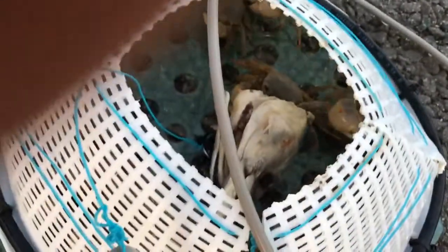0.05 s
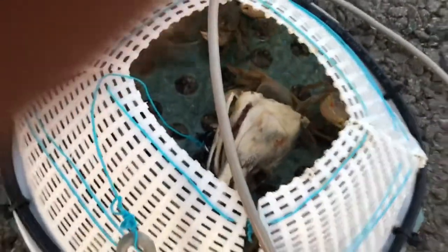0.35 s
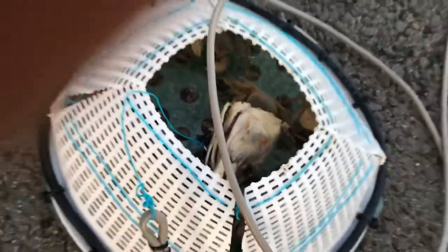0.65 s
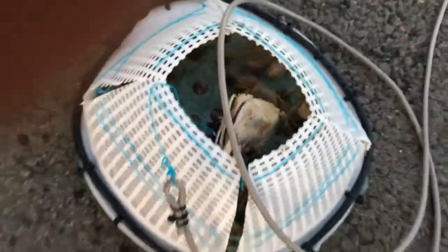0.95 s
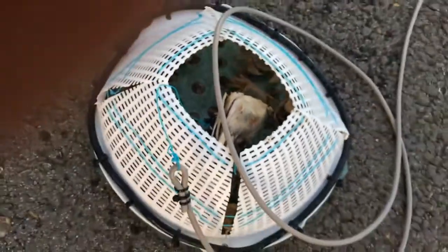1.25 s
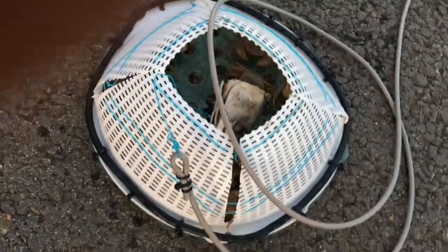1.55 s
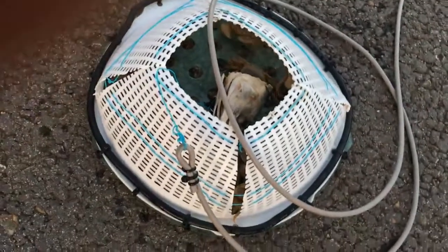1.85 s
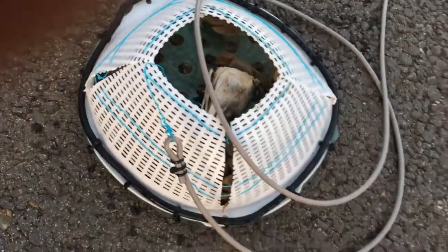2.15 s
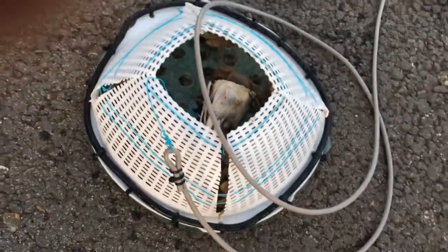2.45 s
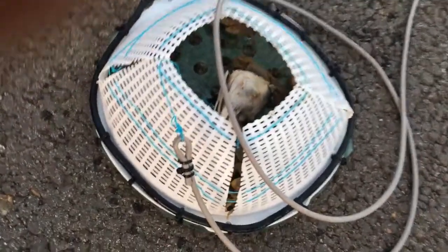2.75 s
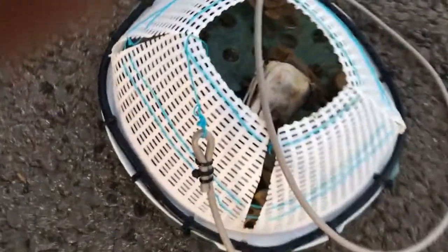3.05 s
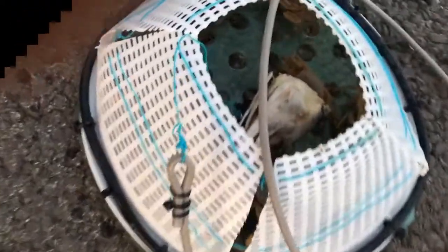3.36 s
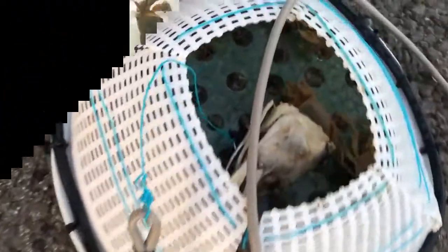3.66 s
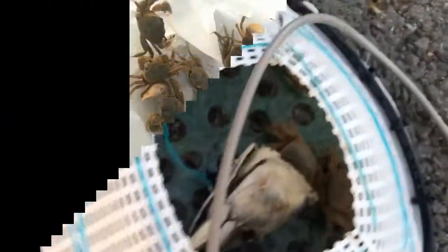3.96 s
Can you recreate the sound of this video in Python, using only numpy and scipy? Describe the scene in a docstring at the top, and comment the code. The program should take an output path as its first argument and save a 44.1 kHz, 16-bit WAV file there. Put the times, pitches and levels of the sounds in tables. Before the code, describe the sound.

Crabs scrabble in a plastic mesh trap, shells crackling and legs snapping and scraping close to the microphone. They settle past halfway, while low outdoor wind rumbles and distant road noise and an engine hum grow.

```python
"""Crabs in a plastic mesh trap standing on asphalt, microphone just above it.
From the start, shells crackle and leg tips snap off the mesh or drag across it in short scrapes,
over a low rumble of wind. The snaps are loudest about a second in. Past halfway the crabs calm down,
while far off a wash of road noise and an engine hum grow, the hum peaking near the end."""
import sys
import numpy as np
from scipy import signal
from scipy.fft import rfft, irfft, next_fast_len
from scipy.io import wavfile

SR = 44100
rng = np.random.default_rng(int(sys.argv[2]) if len(sys.argv) > 2 else 0)


def generate_wav(sig):
    """Save sig (samples, or channels by samples) to the path in sys.argv[1] as 16-bit PCM at SR."""
    pcm = np.round(np.clip(np.atleast_2d(sig).T, -1, 1) * 32767).astype(np.int16)
    wavfile.write(sys.argv[1], SR, pcm)


N = 176400
T = np.arange(N) / SR

# resonances of shell and mesh: frequency_hz, gain_db
TRAP_RESONANCES = [(600,-15),(1300,-11.5),(2050,-3.5),(2550,-6),(3200,0),(4100,0.5),(4900,-4),(5700,3.5),(6400,1.5),(7700,-7.5),(9400,-4.5),(10400,-14),(12000,-10),(15800,-18)]


def leg_snaps():
    """A leg tip or claw snaps off the mesh right under the microphone and rings it briefly."""
    # start_s, level_db, ring_hz, knock_db, click_db, sparkle_db (the last three relative to level_db)
    snaps = [(0.1408, -31.5, 6500, -26, -10, -13), (0.157, -28.5, 5800, -23, -11, -16),
             (0.2066, -30.5, 3970, -24, -13, -11.5), (0.4017, -29, 4850, -15, -10, -15),
             (0.4302, -32.5, 5600, -16, -12, -13), (0.4395, -30.5, 5590, -24, -7.5, -18),
             (0.4616, -34, 3330, -7, -12, -25), (0.5028, -33, 6030, -11, -10, -18),
             (0.5182, -19, 7050, -27, -14.5, -18), (0.5275, -26, 4700, -25, -9, -13),
             (0.5737, -18, 4330, -10, -13, -22), (0.597, -27, 6260, -27, -12, -16),
             (0.6085, -24, 6800, -14, -9.5, -14), (0.6303, -25, 5770, -12, -12, -20),
             (0.6679, -30, 2100, -3, -7.5, -30), (0.6994, -18.5, 3300, -9.5, -14.5, -16.5),
             (0.7092, -27, 3100, -12, -11, -20), (0.7482, -22.5, 3530, -6.5, -27, -21),
             (0.8083, -24, 6400, -36, -12.5, -15), (0.854, -27, 3190, -23, -8.5, -11),
             (0.8933, -17, 5850, -18, -12.5, -19), (0.905, -27, 4360, -13, -20, -17),
             (0.92, -28, 3360, -13, -11, -16), (0.9464, -16, 5130, -17, -11.5, -23),
             (0.9793, -25.5, 6140, -23, -12, -12), (1.0226, -11.5, 3134, -13, -15.5, -20.5),
             (1.0536, -28.5, 6300, -7, -20, -17), (1.0834, -25, 5570, -19, -11, -12.5),
             (1.0919, -24.5, 2120, -11, -16, -19), (1.1007, -22, 5390, -29, -14, -17),
             (1.1069, -27, 6260, -31, -5, -21), (1.1342, -25.5, 3400, -13, -17, -15),
             (1.1598, -10.5, 5740, -20, -16.5, -25), (1.261, -25.5, 3650, -10.5, -14, -18),
             (1.2963, -28.5, 3180, -7.5, -14, -18), (1.3523, -16, 4460, -10.5, -42, -15.5),
             (1.397, -26, 4700, -10.5, -12, -17.5), (1.4222, -23.5, 3640, -10, -11, -19),
             (1.4527, -24.5, 4330, -11, -11, -22), (1.537, -28.5, 5660, -10, -18, -17),
             (1.5899, -31, 3630, -7.5, -17, -11.5), (1.6098, -29, 3800, -6, -11, -15),
             (1.6526, -22, 5990, -22, -12, -15), (1.6984, -30, 3420, -21, -9.5, -12),
             (1.932, -23, 5900, -30, -10.5, -18), (1.987, -24.5, 3720, -18, -11, -18),
             (2.0088, -27, 3300, -9, -16, -32), (2.1193, -30, 3170, -7, -11, -32),
             (2.171, -23, 3350, -9, -10.5, -21), (2.2483, -22, 3700, -11.5, -13, -33),
             (2.2711, -30, 6155, -25, -7.5, -31), (2.2964, -35.5, 2210, -21, -8, -18),
             (2.4572, -33.5, 6010, -16, -11, -15), (2.515, -32.5, 2117, -9.5, -21, -32),
             (2.6509, -29.5, 6350, -28, -10.5, -29), (2.8015, -48, 2430, 1, -3, -5),
             (2.8399, -28, 6140, -16, -10.5, -19), (3.066, -39, 2216, -8, -13, -16),
             (3.252, -33.5, 5960, -32, -6.5, -19), (3.7135, -21, 6270, -16, -11.5, -24),
             (3.7399, -33.5, 2310, -8, -18, -17)]
    registers = [signal.butter(4, 4500, "low", fs=SR, output="sos"),   # knock
                 signal.butter(4, [4500, 8000], "band", fs=SR, output="sos"),   # click
                 signal.butter(4, 8000, "high", fs=SR, output="sos")]   # sparkle
    weights_db = (18.5, 19.5, 19)
    out = np.zeros(N + SR)
    for start_s, level_db, ring_hz, *balance_db in snaps:
        start = int(start_s * SR)
        force = slip(chatter_db=-13, chatter_t60_s=0.008)   # drier than a small tick
        hit = coloured(force + 0.055 * ring(force, ring_hz, t60_s=0.0099), TRAP_RESONANCES)
        for register, share_db, weight_db in zip(registers, balance_db, weights_db):
            part = signal.sosfilt(register, hit)
            gain = from_db(level_db + share_db + weight_db)
            out[start:start + len(hit)] += gain * part / np.linalg.norm(part)
    return out[:N]


def scrabbling(legs=24):
    """Small ticks from many legs, each ringing the trap its own way, over the grit of sliding shell."""
    steps = impulses(per_s=260, spread_db=4)
    which_leg = rng.integers(0, legs, N)
    ticks = np.zeros(N)
    for leg, ring_hz in enumerate(np.geomspace(2800, 12000, legs)):
        force = slip(chatter_db=-18.5, chatter_t60_s=0.014)
        colour = [(hz, db + 5.5 * rng.standard_normal()) for hz, db in TRAP_RESONANCES]
        tick = coloured(force + 0.39 * ring(force, ring_hz, t60_s=6.2 / ring_hz), colour)
        ticks += signal.oaconvolve(steps * (which_leg == leg), rms_one(tick))[:N]
    grit = coloured(impulses(per_s=2200, spread_db=6.5), TRAP_RESONANCES) * stutter()
    crackle = from_db(0.5) * rms_one(ticks) + from_db(-4.5) * rms_one(grit)
    return pressed(crackle, effort())


def slip(chatter_db, chatter_t60_s, samples=2600):
    """A sharp impulse as the tip lets go, with a short chatter and a faint, longer shiver of the mesh."""
    fall_db = -60 * T[:samples]
    chatter = from_db(chatter_db + fall_db / chatter_t60_s)
    shiver = from_db(-30.5 + fall_db / 0.059)
    force = rng.standard_normal(samples) * (chatter + shiver)
    force[0] = rng.choice([-1, 1])
    return force


def effort(edge_s=0.0088):
    """Strength of the scrabbling: the power of each scrape adds to that of the constant stirring."""
    # restless stirring of all the crabs: time_s, level_db
    stirring = [(0,-51),(.24,-49.5),(.33,-55),(.41,-53),(.5,-56.5),(.57,-50),(.81,-49),(.92,-44),(.97,-50.5),(1.15,-47.5),(1.25,-55),(1.42,-52),(1.62,-54),(1.8,-55.5),(2.0,-50.5),(2.3,-51.5),(2.52,-58.5),(3.13,-61),(3.35,-54),(4,-59.5)]
    # a leg drags over the plastic: start_s, length_s, level_db
    scrapes = [(0.029,0.035,-48),(0.14,0.12,-57),(0.424,0.054,-46),(0.517,0.033,-43),(0.728,0.074,-48),(.835,0.042,-47),(0.9,0.04,-44),(0.991,0.076,-42.5),(1.107,0.025,-44),(1.131,0.058,-41),(1.345,0.018,-40),(1.44,0.041,-47),(1.661,0.091,-51.5),(1.869,0.12,-49.5),(1.982,0.064,-51),(2.083,0.059,-55.5),(2.167,0.015,-47),(2.2,0.095,-50),(2.36,0.076,-55.5),(2.639,0.035,-53),(2.84,0.063,-54.5),(3.045,.03,-58),(3.25,0.035,-49.5),(3.38,0.088,-50.5),(3.88,.11,-51.5)]
    power = from_db(in_time(stirring)[0]) ** 2
    for start_s, length_s, level_db in scrapes:
        swell = np.clip(np.minimum(T - start_s, start_s + length_s - T) / edge_s, 0, 1)
        power += (from_db(level_db) * swell) ** 2
    return np.sqrt(power)


def stutter(top_hz=45, depth_db=2.0):
    """Quick random swings of gain as the legs catch and let go."""
    swing = signal.sosfilt(signal.butter(2, top_hz, fs=SR, output="sos"), rng.standard_normal(N))
    return from_db(depth_db * rms_one(swing))


def pressed(crackle, strength, treble_hz=7600, full_effort_db=-52):
    """The gentler the contact, the quieter it is and the less treble it keeps."""
    dull = signal.sosfilt(signal.butter(1, treble_hz, fs=SR, output="sos"), crackle)
    treble_gain = np.minimum(strength / from_db(full_effort_db), 1) ** 0.12
    return strength * (dull + treble_gain * (crackle - dull))


def wind():
    """Moving air rumbles low, rising and falling."""
    # spectrum of the rumble: frequency_hz, relative_db
    spectrum = [(18,-33),(35,-14.5),(50,-1.5),(68,-1),(100,-3),(130,-8),(220,-17.5),(320,-22.5),(450,-36.5),(700,-41.5),(1500,-61)]
    # gusts: time_s, level_db
    gusts = [(0,-33.5),(.35,-38),(.7,-34),(1.3,-35.5),(1.9,-32),(2.2,-32),(2.35,-29),(2.55,-34),(2.75,-32),(3.05,-30.5),(3.8,-29),(4,-28.5)]
    return from_db(in_time(gusts)[0]) * noise(spectrum)


def distant_road():
    """Far tyre roar with a low body, a hollow drone in it and a brighter wash that swells."""
    # spectra of the road noise bands: frequency_hz, relative_db
    roar = [(150,-7),(350,-8),(520,-5),(760,-0.5),(900,-2.5),(1100,-2),(1500,-9),(2200,-17.5),(3500,-21),(7000,-35.5),(11000,-42),(15000,-38)]
    wash = [(600,-36),(1050,-6),(1500,8.5),(1900,2),(2600,-10),(4000,-18.5),(8000,-80.5)]
    drone = [(600,-22.5),(700,0.5),(760,10),(830,-4.5),(950,-21.5)]
    wash_top = [(1200,-27.5),(1750,-5.5),(2300,-7),(3000,-23.5),(5000,-30)]
    body = [(100,-22),(150,1.5),(225,1.5),(270,-6.5),(350,-7.5),(450,-21),(700,-44.5)]
    # swell of the roar and wash: time_s, roar_db, wash_db
    road_levels = [(0,-48.5,-59),(.8,-48,-86),(1.5,-46,-69),(2.1,-46.5,-58),(2.75,-46,-47.5),(3.2,-44,-53),(3.55,-46.5,-48.5),(4,-46.5,-56.5)]
    # swell of the other bands: time_s, level_db
    drone_levels = [(0,-61),(1.6,-58),(2.15,-64),(2.55,-50),(2.85,-61),(3.25,-50.5),(3.6,-58),(4,-55)]
    wash_top_levels = [(0,-60.5),(2.1,-73),(2.7,-60.5),(3.2,-61),(3.55,-63),(3.72,-56),(3.88,-51.5),(4,-57)]
    body_levels = [(0,-50),(1.0,-46.5),(1.7,-44.5),(2.1,-38),(2.4,-42),(2.8,-39.5),(3.3,-40.5),(4,-39.5)]
    roar_db, wash_db = in_time(road_levels)
    bands = [(roar, roar_db), (wash, wash_db), (drone, in_time(drone_levels)[0]),
             (wash_top, in_time(wash_top_levels)[0]), (body, in_time(body_levels)[0])]
    return sum(from_db(level_db) * noise(spectrum) for spectrum, level_db in bands)


def distant_engine():
    """A far engine hums in three harmonics, its pitch creeping up."""
    # course of the hum: time_s, pitch_hz, level_db
    course = [(0,73.74,-43),(1.3,76.2,-35),(1.55,76,-34),(1.9,78.23,-40.5),(2.82,77.4,-36.5),(3.2,78.55,-31),(3.4,79.23,-25.5),(3.87,78.74,-28.5),(4,81.3,-35)]
    # engine harmonics: multiple, relative_db
    harmonics = [(1,0.5),(2,-15),(3,-21.5)]
    pitch_hz, level_db = in_time(course)
    phase = 2 * np.pi * np.cumsum(pitch_hz) / SR
    hum = sum(from_db(db) * np.sin(multiple * phase + 2 * np.pi * rng.random())
              for multiple, db in harmonics)
    return from_db(level_db) * rms_one(hum)


def from_db(db):
    """Decibels to gain."""
    return 10 ** (np.asarray(db) / 20)


def rms_one(x):
    """Scale to an rms of one."""
    return x / np.sqrt(np.mean(x ** 2) + 1e-20)


def in_time(rows):
    """Each column of a curve, at every sample."""
    time_s, *columns = np.transpose(rows)
    return [np.interp(T, time_s, column) for column in columns]


def coloured(x, spectrum):
    """Causal (minimum-phase) filter with the given spectrum."""
    size = 2 * next_fast_len(len(x))
    hz, db = np.transpose(spectrum)
    bins_hz = np.maximum(np.arange(size // 2 + 1) * SR / size, 1)
    gain = from_db(np.interp(np.log(bins_hz), np.log(hz), db))
    cepstrum = irfft(np.log(gain))
    cepstrum[1:size // 2] *= 2
    cepstrum[size // 2 + 1:] = 0
    return irfft(rfft(x, size) * np.exp(rfft(cepstrum)))[:len(x)]


def noise(spectrum):
    """Steady noise of rms one, falling 24 dB an octave above the last point of its spectrum."""
    top_hz, top_db = spectrum[-1]
    skirt = (SR, top_db - 24 * np.log2(SR / top_hz))
    return rms_one(coloured(rng.standard_normal(N), [*spectrum, skirt]))


def ring(force, hz, t60_s):
    """One resonance: a unit impulse starts a decaying sine of height one."""
    decay = from_db(-60 / (t60_s * SR))
    angle = 2 * np.pi * hz / SR
    return signal.lfilter([0, np.sin(angle)], [1, -2 * decay * np.cos(angle), decay ** 2], force + 1e-18)


def impulses(per_s, spread_db):
    """Random impulses, many small and a few large, capped in size."""
    sizes = from_db(spread_db * np.minimum(rng.exponential(1, N), 2.02))
    return sizes * rng.choice([-1, 1], N) * (rng.random(N) < per_s / SR)


def scene():
    """The trap close under one microphone, wind and far traffic behind it."""
    return (wind() + distant_road() + distant_engine() + scrabbling() + leg_snaps())[None]


def record(dry):
    """The recorder cuts off steeply above 15850 Hz."""
    return signal.sosfilt(signal.ellip(10, 0.1, 80, 15850, fs=SR, output="sos"), dry)


dry = scene()
out = record(dry)
generate_wav(out)
```